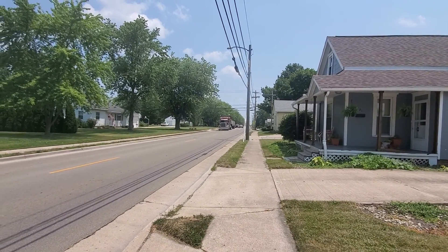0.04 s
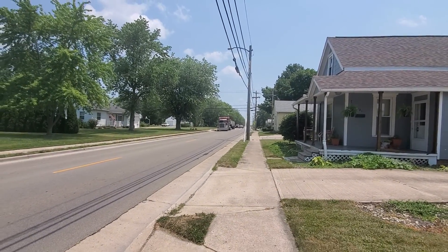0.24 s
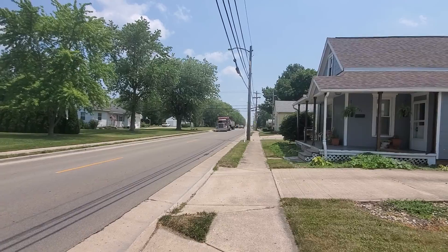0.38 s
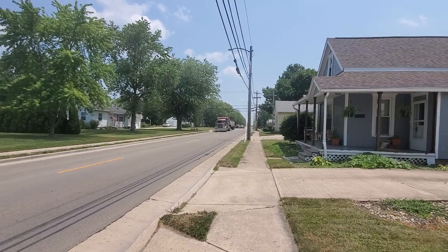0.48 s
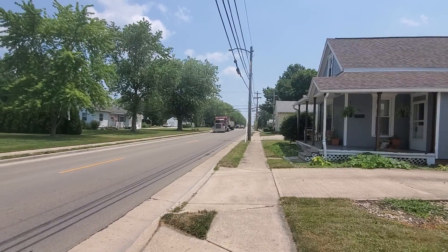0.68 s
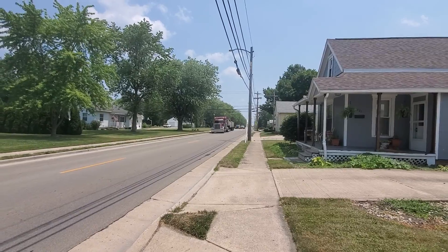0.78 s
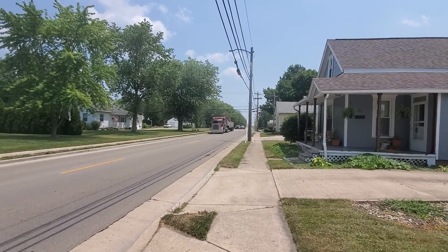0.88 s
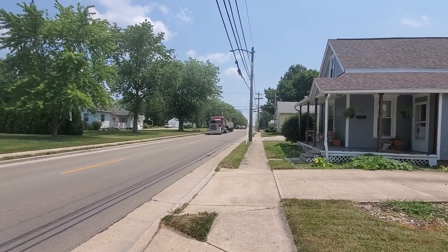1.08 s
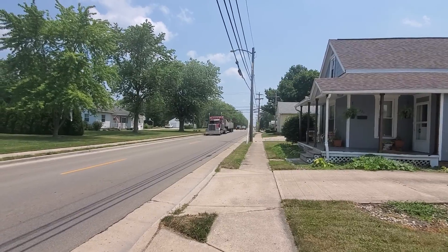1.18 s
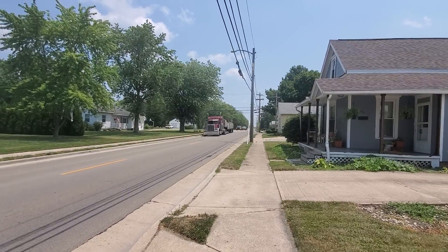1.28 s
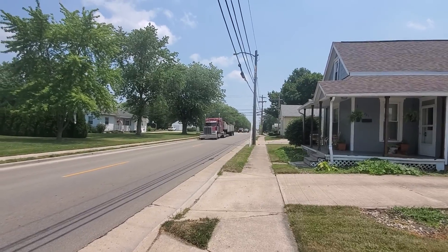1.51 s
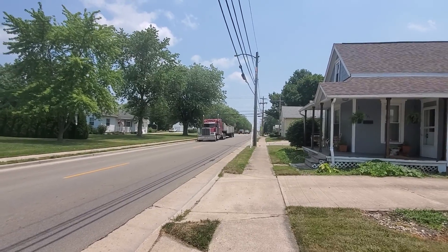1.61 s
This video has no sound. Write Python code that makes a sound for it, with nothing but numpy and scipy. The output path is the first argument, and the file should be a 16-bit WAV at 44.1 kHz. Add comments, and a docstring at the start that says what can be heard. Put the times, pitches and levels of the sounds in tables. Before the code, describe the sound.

On a residential street, an approaching truck rumbles faintly, then gives a single loud blast of its multi-toned air horn. The chord sags, recovers and ends in a short, smeared echo, heard from the sidewalk.

```python
"""Diesel rumble, tyre noise and faint hanging horn tones: a truck comes up a residential street.
Almost at once it sounds one long blast on a chord of air horns, four rasping reeds on one air line;
the pressure dips once midway. Roadside trees and house fronts send back copies that sag in pitch
as the truck passes them, so the chord beats and smears."""
import sys
import numpy as np
from scipy import signal
from scipy.fft import rfft, irfft, next_fast_len
from scipy.io import wavfile
from scipy.ndimage import uniform_filter1d, map_coordinates

SR = 44100
rng = np.random.default_rng(int(sys.argv[2]) if len(sys.argv) > 2 else 0)


def inscribe(sig):
    """Save sig as 16-bit PCM at rate SR to the path in sys.argv[1].

    A 1-D sig is mono; a 2-D sig holds one channel per row.
    Samples are clipped to [-1, 1] before scaling.
    """
    pcm = np.round(np.clip(np.atleast_2d(sig).T, -1, 1) * 32767)
    wavfile.write(sys.argv[1], SR, pcm.astype(np.int16))


N = 72765


def amp(db):
    """Decibels to gain."""
    return 10 ** (np.asarray(db) / 20)


def unit_rms(x):
    """Scale to rms 1."""
    return x / np.sqrt(np.mean(x ** 2) + 1e-20)


def log_interp(points, at):
    """(position, value) points read on a log axis."""
    positions, values = np.transpose(points)
    return np.interp(np.log(at + 0.0014), np.log(positions), values)


def curve(points):
    """(time [s], value) points, read per sample."""
    return np.interp(np.arange(N) / SR, *np.transpose(points))


def wobble(rate_hz):
    """Smooth random curve, knots at rate_hz."""
    knots = rng.standard_normal(int(N * rate_hz / SR) + 4)
    return map_coordinates(knots, [np.arange(N) * rate_hz / SR])


def filtered(x, response):
    """Zero-phase filter, gain response(hz)."""
    size, pad = next_fast_len(N + SR // 2), SR // 8
    padded = np.pad(x, [(0, 0)] * (x.ndim - 1) + [(pad, pad)], mode="reflect")
    gain = response(np.fft.rfftfreq(size, 1 / SR))
    return irfft(rfft(padded, size) * gain, size)[..., pad:pad + N]


# Stereo likeness of noise (frequency [Hz], correlation [1])
CORRELATION = [(60, 0.22), (300, 0.95), (1000, 0.2), (3000, 0.21), (8000, 0.025)]
def noise(spectrum):
    """Coloured stereo noise, rms 1, near mono around 300 Hz."""
    size = next_fast_len(N)
    hz = np.fft.rfftfreq(size, 1 / SR)
    angle = np.arccos(np.clip(log_interp(CORRELATION, hz), -1, 1)) / 2
    coloured = rfft(rng.standard_normal((2, size))) * amp(log_interp(spectrum, hz))
    mid, side = irfft(coloured * [np.cos(angle), np.sin(angle)], size)[:, :N]
    return unit_rms(np.array([mid + side, mid - side]))


# Engine noise (frequency [Hz], density [dB])
RUMBLE_SPECTRUM = [(20, -20), (35, 3), (52, -7.5), (70, 7), (95, -2.5), (130, -11.5), (250, -13),
                   (400, -20.5), (800, -67.5)]
# Firing tones (harmonic [1], level re noise [dB])
FIRING_HARMONICS = [(1, -5), (2, -13), (3, -15.5)]
# Engine envelope (time [s], level [dB])
DIESEL_LEVEL = [(0, -34.5), (.12, -32), (.3, -38), (.65, -37), (1, -40), (1.2, -51.5), (1.33, -37.5),
                (1.48, -46), (1.58, -29), (1.65, -55)]
def diesel(firing_hz=53.9):
    """Low rumble plus harmonics of an unsteady firing rate."""
    phase = 2 * np.pi * np.cumsum(firing_hz * (1 + 0.01 * wobble(8.08))) / SR
    firing = sum(np.sqrt(2) * amp(db + 0.67 * wobble(6.9)) * np.sin(k * phase)
                 for k, db in FIRING_HARMONICS)
    return amp(curve(DIESEL_LEVEL)) * unit_rms(noise(RUMBLE_SPECTRUM) + firing)


# Tyre noise (frequency [Hz], density [dB])
TYRE_SPECTRUM = [(100, -9.5), (280, -7), (550, -3.5), (800, -0.5), (1000, -5), (1300, -6.5), (2000, -7.5),
                 (3000, -8.5), (3900, -18.5), (8000, -31), (9200, -36), (13000, -48), (15500, -62)]
def tyres(gain_db=-37.5):
    """Broad rush of rolling tyres."""
    return amp(gain_db) * noise(TYRE_SPECTRUM)


# Faint horn tones (centre [Hz], level [dB])
HANGING_TONES = [(456, -49.5), (630, -46), (695, -46), (1240, -44.5), (1325, -48)]
def hanging_tones():
    """Narrow noise bands, heard as wavering tones."""
    band = [(.706, -60), (.985, -6), (1, 0), (1.1, -6), (1.29, -60)]  # (frequency ratio [1], level [dB])
    return sum(amp(db) * noise([(hz * ratio, band_db) for ratio, band_db in band])
               for hz, db in HANGING_TONES)


# Envelope of tyres and faint tones (time [s], level [dB])
STREET_ENVELOPE = [(0, 1), (1.3, -3), (1.5, 0), (1.65, -3.5)]
def traffic():
    """Bed under the blast: engine, tyres, faint tones."""
    tones = hanging_tones()
    return diesel() + amp(curve(STREET_ENVELOPE)) * (tyres() + tones)


# Air line (time [s], pressure [dB])
AIR_PRESSURE = [(.19, -33.5), (.213, -15), (.235, -4.5), (.28, 3.5), (.34, 2.5), (.44, 0.5), (.51, -7),
                (.57, -8), (.61, -3), (.67, 1), (.9, 2), (1.07, 2), (1.19, -2), (1.27, -8), (1.34, -10),
                (1.385, -17)]
def partial(phase, hz, db, stall_db=-10, flutter_db=1.92):
    """One horn tone: higher ones follow pressure more steeply; the upper mids bark at the start."""
    pressure_db = curve(AIR_PRESSURE)
    slope = min(.3 + .17 * max(np.log2(hz / 500), 0) ** 2 / 2, 1)  # dB per dB of pressure
    stall_gate = 1 / (1 + amp(stall_db - pressure_db) ** 2)
    bark_s, width_s, bark_hz, width_oct = .284, .038, 3120, .31
    bark_db = 11.5 * np.exp(-((np.arange(N) / SR - bark_s) / width_s) ** 2
                            - (np.log2(hz / bark_hz) / width_oct) ** 2)
    fading_db = flutter_db * min(hz / 900, 1) * wobble(14.15)  # fading in the air
    envelope = stall_gate * amp(db + slope * pressure_db + bark_db + fading_db)
    return np.sqrt(2) * envelope * np.sin(phase + 2 * np.pi * rng.random())


# Lead horn pitch; the others follow (time [s], pitch [Hz])
LEAD_PITCH = [(.2, 696.8), (.24, 693), (.29, 684), (.36, 682.6), (.46, 681.1), (.53, 676.6), (.6, 686.2),
              (.72, 681.4), (.9, 685.6), (1.2, 682), (1.36, 678)]
# Horn spectra (harmonic [1], level [dB])
LEAD_HARMONICS = [(1, -21.5), (2, -24), (3, -39.5), (4, -35.5), (5, -41), (6, -44.5), (7, -49.5), (8, -55),
                  (9, -52.5), (12, -57.5), (14, -67), (22, -74)]
MIDDLE_HARMONICS = [(1, -21.5), (2, -34), (3, -28.5), (4, -38), (5, -43.5), (6, -35.5), (7, -65), (9, -48),
                    (18, -65), (21, -80), (32, -78)]
LOW_HARMONICS = [(1, -28), (2, -37.5), (3, -38.5), (4, -41.5), (5, -47), (8, -54.5), (10, -58), (20, -58),
                 (23, -85), (36, -80)]
SQUEAL_HARMONICS = [(1, -28.5), (2, -42.5), (3, -59), (4, -45), (8, -57), (18, -79)]
# Horn envelopes (time [s], level [dB])
LEAD_LEVEL = [(.22, 7), (.29, 0), (.36, 0.5), (.48, 0.5), (.58, 4.5), (.66, -0.5), (.9, -1), (1.1, -2.5),
              (1.22, 3), (1.33, 2)]
MIDDLE_LEVEL = [(0.222, 5.5), (.28, 0.5), (.34, -4), (.42, 1.5), (.5, -0.5), (.62, 2.5), (.8, -2.5),
                (1.1, -2.5), (1.33, -3.5)]
LOW_LEVEL = [(.22, 2.5), (.28, 2.5), (.34, -7.5), (.43, 1.5), (.49, -2), (.56, 5), (.63, 5), (.8, -0.5),
             (1.1, 2), (1.33, -3.5)]
SQUEAL_LEVEL = [(.22, -40), (.28, 1), (.35, 1.5), (.44, -8.5), (.52, -25), (.7, -12)]
# Sum tones (first horn, second horn, level [dB])
HORN_PAIRS = [("lead", "middle", -41.5), ("lead", "low", -49.5), ("squeal", "low", -29),
              ("squeal", "middle", -28)]
LEAD_HZ, MIDDLE_HZ, LOW_HZ, SQUEAL_HZ, TOP_HZ = 683, 458, 415.5, 777, 15750
def horns(jitter=0.001098):
    """Four reeds on one air line: harmonics, plus the sum tones their loudness breeds."""
    bank = {"lead": (LEAD_HZ, LEAD_HARMONICS, LEAD_LEVEL),
            "middle": (MIDDLE_HZ, MIDDLE_HARMONICS, MIDDLE_LEVEL),
            "low": (LOW_HZ, LOW_HARMONICS, LOW_LEVEL),
            "squeal": (SQUEAL_HZ, SQUEAL_HARMONICS, SQUEAL_LEVEL)}
    bend = curve(LEAD_PITCH) / LEAD_HZ
    chord, reeds = np.zeros(N), {}
    for name, (hz, harmonics, envelope) in bank.items():
        unrest = 1 + jitter * (wobble(24.9) + 2 * wobble(300))
        phase = 2 * np.pi * np.cumsum(hz * bend * unrest) / SR
        level_db = curve(envelope)
        reeds[name] = phase, hz, level_db
        for k in range(1, int(TOP_HZ / hz)):
            chord += partial(k * phase, k * hz, log_interp(harmonics, k) + level_db)
    for first, second, db in HORN_PAIRS:
        phase, hz, level_db = (a + b for a, b in zip(reeds[first], reeds[second]))
        chord += partial(phase, hz, db + level_db)
    return chord


# Air noise at the reeds (frequency [Hz], density [dB])
RASP_SPECTRUM = [(800, -29), (1500, -3), (2000, -2.5), (2400, -11.5), (2700, -27), (3300, 5), (3650, -15),
                 (4200, -9.5), (5000, -12.5), (8200, -10), (8900, -31), (13000, -33), (15500, -46)]
SIZZLE_SPECTRUM = [(5000, -42), (8000, -1), (9000, 2), (12500, -2.5), (15500, -15)]
def air_rasp(chord, rasp_db=-33, sizzle_db=-47, pulsing=0.28):
    """Air tears through the reeds, crackling on the chord's crests; the sizzle needs full pressure."""
    pressure_db = curve(AIR_PRESSURE)
    local_rms = np.sqrt(abs(uniform_filter1d(chord ** 2, size=1000)) + 1e-9)
    crests = unit_rms(np.exp(pulsing * np.minimum(chord / local_rms, 3)))
    rasp = amp(rasp_db + pressure_db) * noise(RASP_SPECTRUM)
    sizzle = amp(sizzle_db + 1.54 * pressure_db) * noise(SIZZLE_SPECTRUM)
    return crests * (rasp + sizzle)


TRUCK_M_S, SOUND_M_S = 19, 343
def echo(x, pass_s, offset_m, pan_db, skew_s):
    """One reflection, loudest with the truck abreast; the growing detour lowers its pitch."""
    t = np.arange(N) / SR
    ahead_m = TRUCK_M_S * (pass_s - t)
    range_m = np.hypot(ahead_m, offset_m)
    arrival_s = t + (range_m - ahead_m) / SOUND_M_S
    reflected = x * np.sqrt(abs(offset_m) / range_m)
    channels = []
    for side in (1, -1):
        emitted_s = np.interp(t + side * skew_s, arrival_s, t)
        channels.append(amp(side * pan_db / 2) * map_coordinates(reflected, [emitted_s * SR]))
    return np.array(channels)


# Roadside response (frequency [Hz], gain [dB])
ECHO_RESPONSE = [(400, -10.5), (480, -15.5), (620, -11.5), (690, 1), (780, -3), (890, 5.5), (1000, -0.5),
                 (1180, -5), (1320, -1), (1960, 5), (2700, 3.5), (6000, 0), (14000, -7.5)]
# Large reflectors (pass time [s], offset from road [m], level [dB], L-R [dB], L lead and R lag [s])
HOUSE_FRONTS = [(1.25, 12.5, -1.5, 3, -.00003), (1.98, 16, -5, -4.5, .00012), (2.1, 14, -10.5, 4.5, -.0001),
                (0.12, 30, -12.5, 2, .0001)]
# Diffuse tail (frequency [Hz], T60 [s])
TAIL_T60 = [(400, 0.29), (700, 0.69), (1500, 1.0), (3000, 1.0), (6000, 0.47), (14000, 0.18)]
def street_echoes(blast, tree_count=12, trees_db=-13, tail_db=-13.5):
    """House fronts and scattered trees reflect the blast; a diffuse tail follows."""
    x = filtered(blast, lambda hz: amp(log_interp(ECHO_RESPONSE, hz)))
    walls = sum(amp(db) * echo(x, pass_s, offset_m, pan_db, skew_s)
                for pass_s, offset_m, db, pan_db, skew_s in HOUSE_FRONTS)
    trees = sum(echo(x, -.3 + 2.2 * along, 6 + 24 * away, 8 * (pan - .5), 0.00023 * (pan - .5))
                for along, away, pan in rng.random((tree_count, 3)))
    early = walls + amp(trees_db) * trees / np.sqrt(tree_count)
    hz, t, bins = signal.stft(rng.standard_normal((2, SR)), SR, nperseg=256)
    decay = amp(-60 * t / log_interp(TAIL_T60, hz)[:, None])
    tail = signal.istft(bins * decay, SR, nperseg=256)[1]
    late = signal.fftconvolve(early + x / 2, tail / np.linalg.norm(tail[0]), axes=1)[:, :N]
    return early + amp(tail_db) * late


def scene():
    """Traffic, horn blast and echoes."""
    chord = horns()
    air = air_rasp(chord)
    echoes = street_echoes(chord + air[0])
    return traffic() + chord + air + echoes


# Microphone port balance (frequency [Hz], L-R [dB])
PORT_BALANCE = [(60, -7), (140, 0), (330, -1.5), (450, -6), (750, 0.5), (1300, -5.5), (1900, -2.5),
                (4200, -1.5), (6400, 5), (9800, -5), (14000, -13)]
def record(dry, ceiling=.95):
    """Two unequally coloured ports, soft clip, band limit."""
    heard = filtered(dry, lambda hz: amp(log_interp(PORT_BALANCE, hz) * np.array([[.5], [-.5]])))
    rounded = heard / (1 + abs(heard / ceiling) ** 10) ** (1 / 10)
    return filtered(rounded, lambda hz: hz < TOP_HZ)


dry = scene()
out = record(dry)
inscribe(out)
```